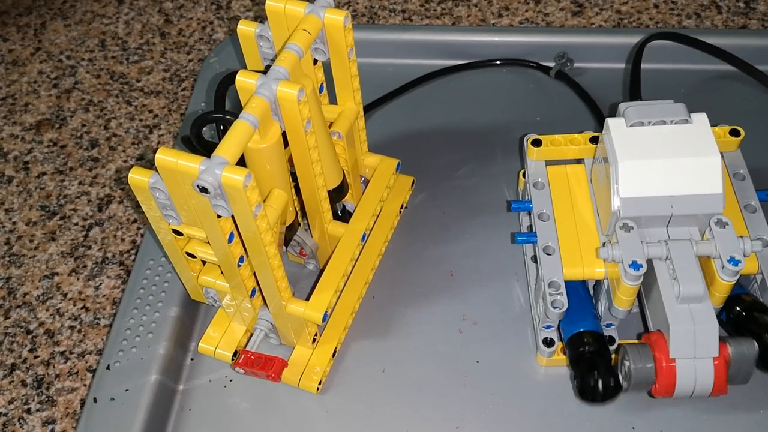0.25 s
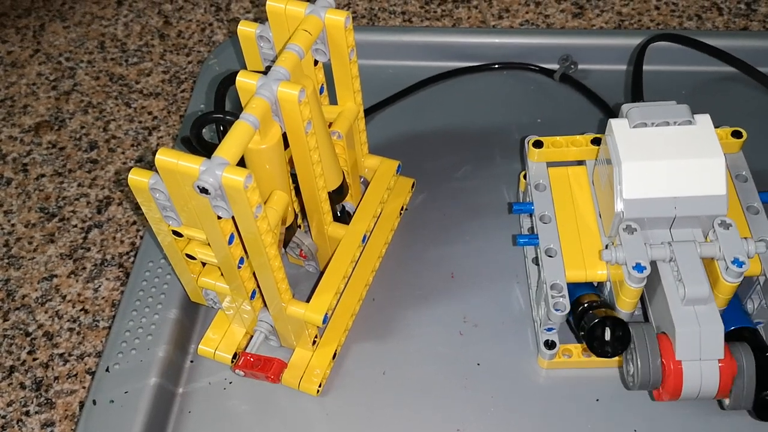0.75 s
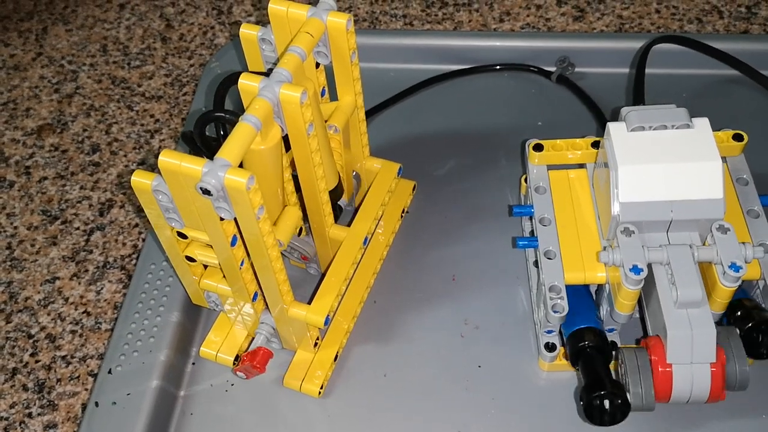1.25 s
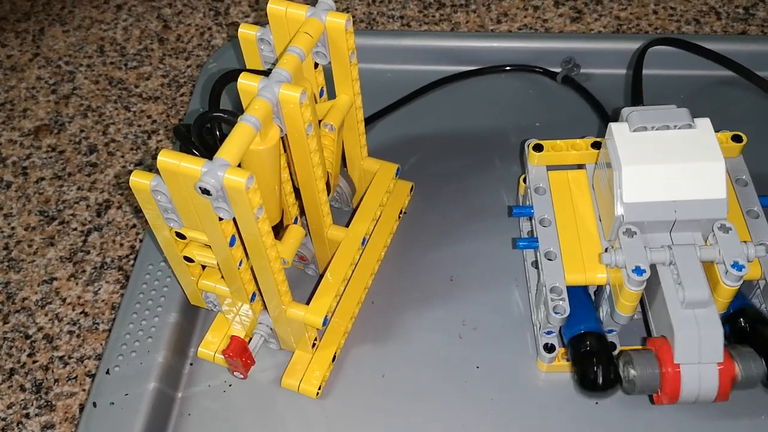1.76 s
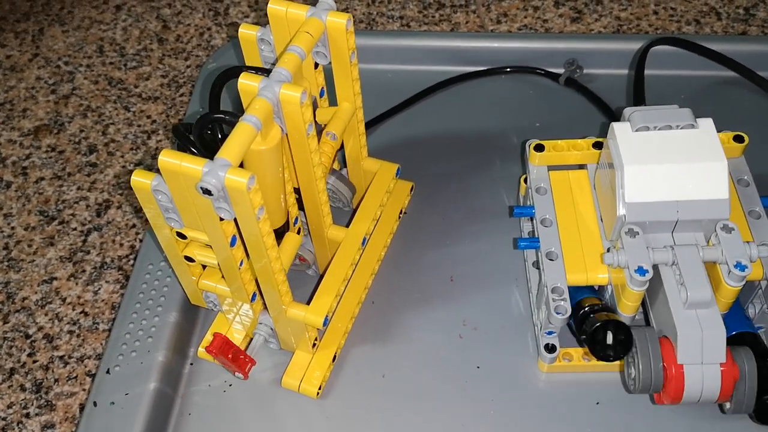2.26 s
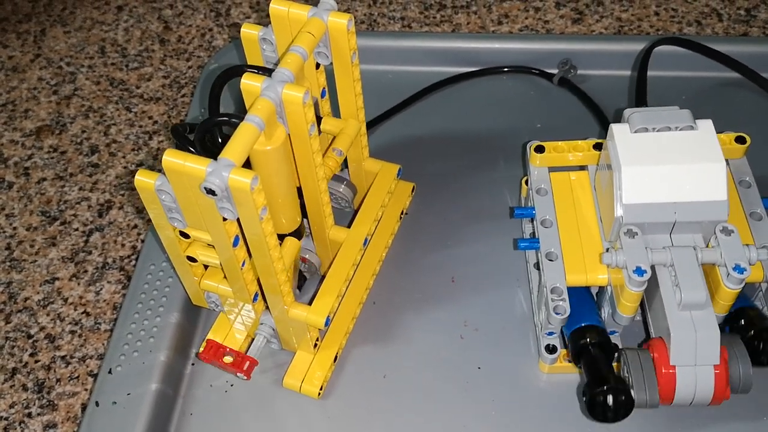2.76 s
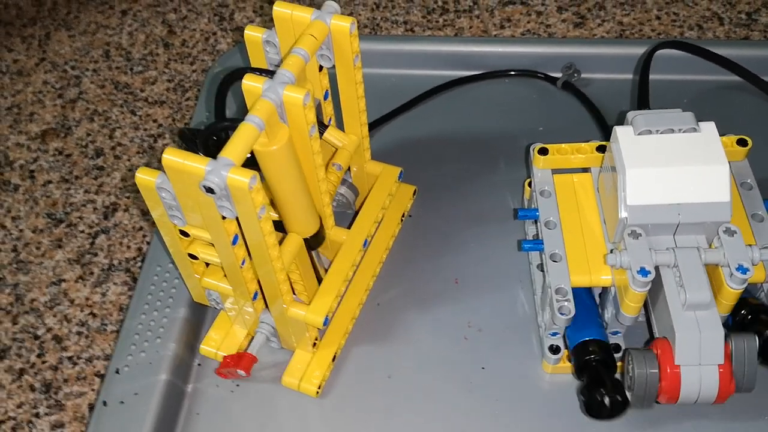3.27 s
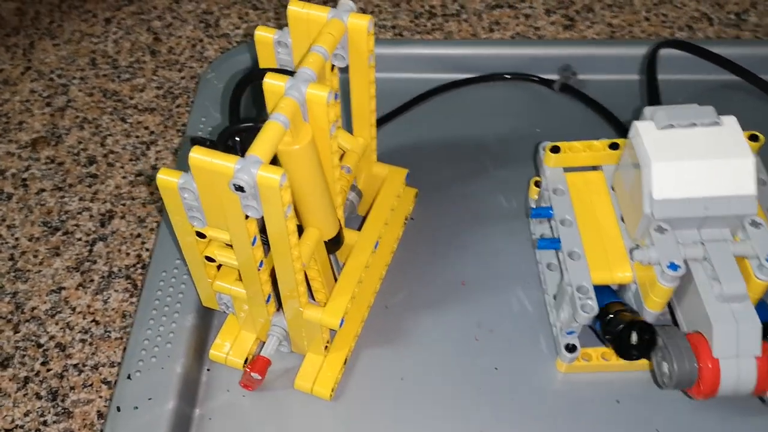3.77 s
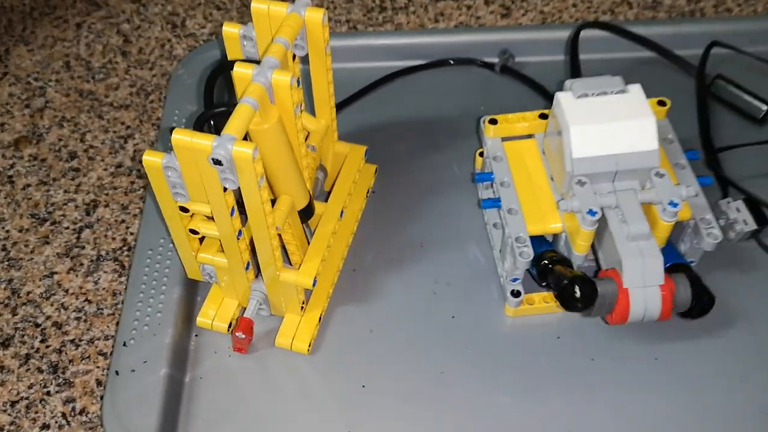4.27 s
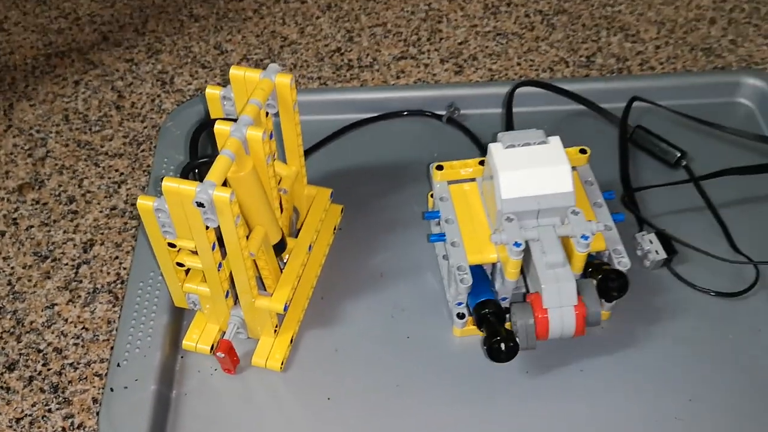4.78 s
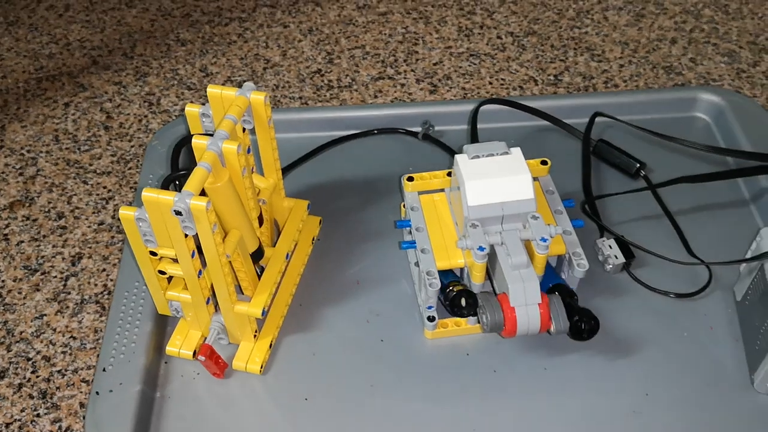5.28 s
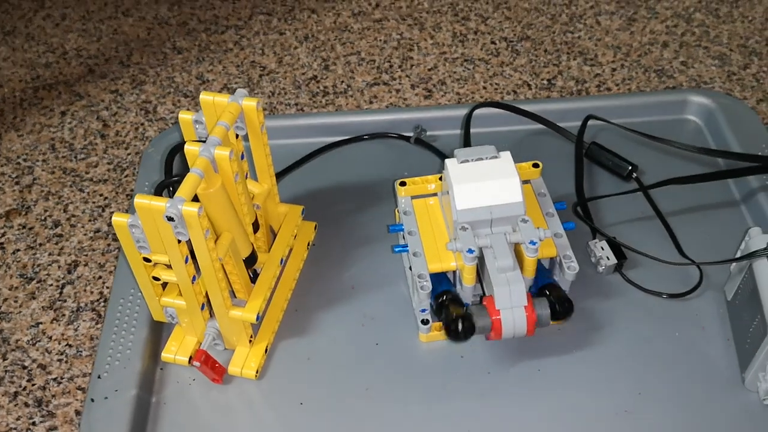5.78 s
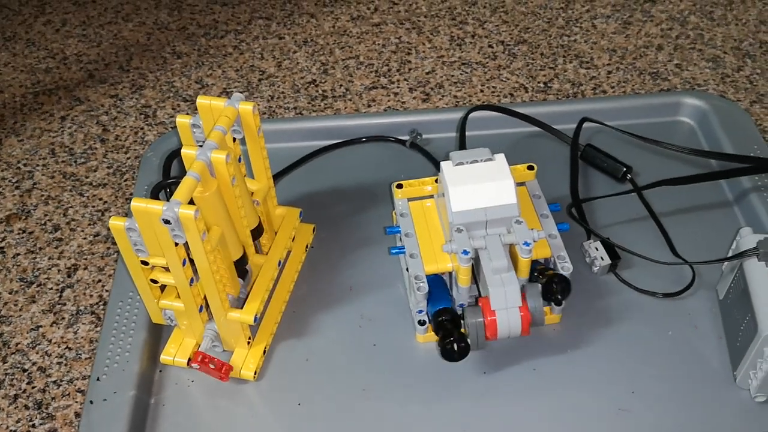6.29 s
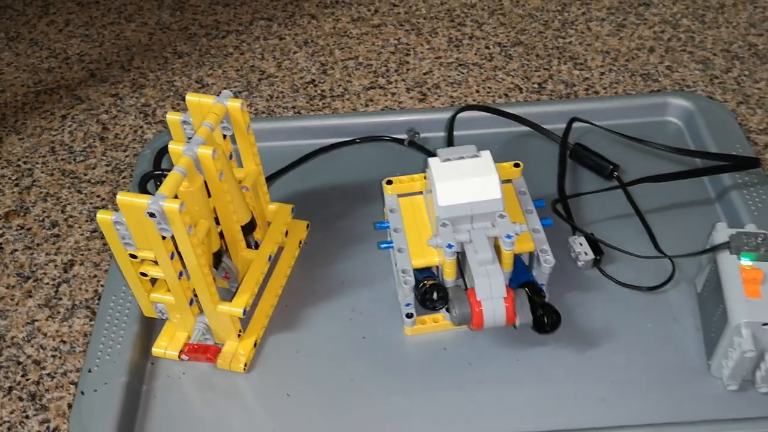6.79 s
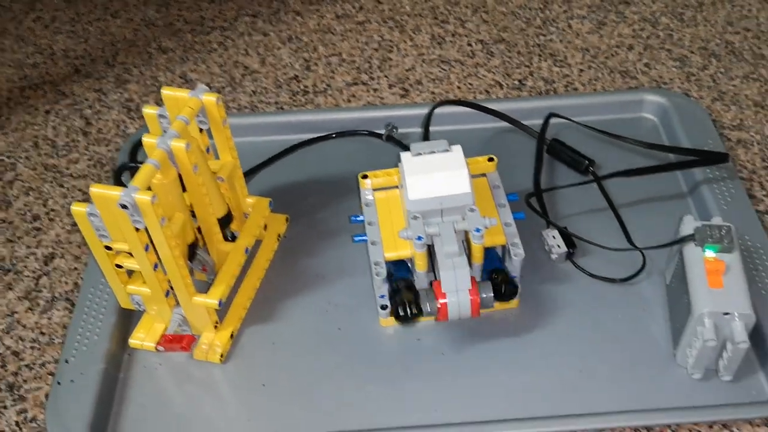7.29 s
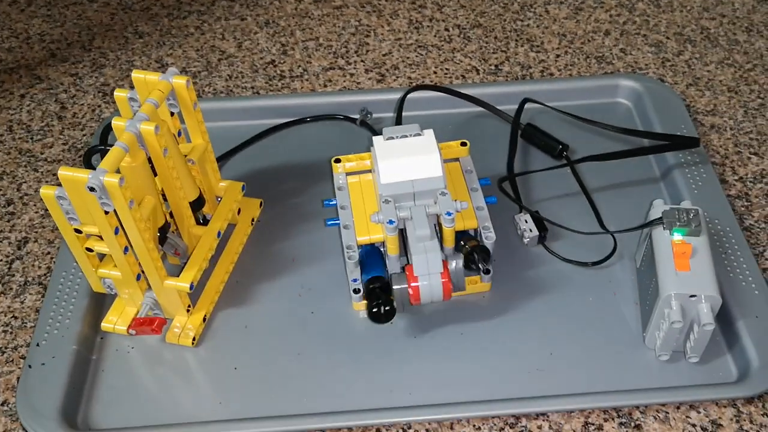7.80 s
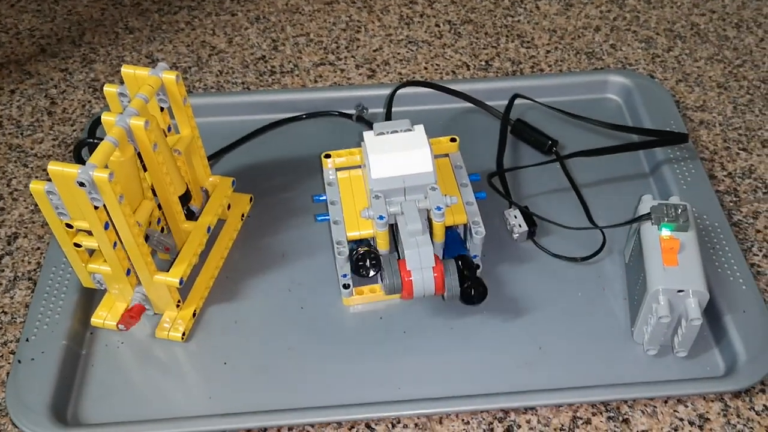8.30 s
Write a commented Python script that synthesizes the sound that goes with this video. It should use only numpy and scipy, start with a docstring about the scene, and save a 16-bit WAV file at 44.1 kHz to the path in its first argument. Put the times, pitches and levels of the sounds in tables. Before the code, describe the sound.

From 0 to about 8.7 seconds a small geared motor works two plastic air pumps on a metal tray, heard close with short room reflections and faint deep rumble. Strokes come about every 0.35 to 0.4 seconds, slightly uneven. In each, the motor labours low and quiet, a sharp-edged puff of hissing air opens, a plastic clack and dull thud fall inside it, then the gears race: a ticking, buzzy whine sweeps up to around a thousand teeth per second and back down over bright rasping chatter and a ringing case. Clack strength varies, often alternating. The machine grows slightly quieter over the first 3.6 seconds as the handheld microphone draws back. A soft low bump comes at 1.2 seconds, a hard booming cluster at 3.9 to 4.1, and another dull knock at 5.8. Pumping continues to the end.

```python
"""A geared toy motor cranks two air pumps on a metal tray for a pneumatic toy engine, over low room rumble.
Each stroke: the motor labours, a puff of noise opens, the crank clacks and thuds within it, and the motor
races as the piston turns over: ticking teeth whine up and down over rasping chatter and a ringing gear case.
The hand-held camera draws back, mostly in the first 3.6 s. Damped low modes ring as it is bumped:
softly at 1.2 s, in a hard cluster around 4 s and once more at 5.8 s."""
import sys
import numpy as np
from scipy import signal
from scipy.fft import rfft, irfft, next_fast_len
from scipy.io import wavfile
from scipy.ndimage import map_coordinates

SR = 44100
rng = np.random.default_rng(int(sys.argv[2]) if len(sys.argv) > 2 else 0)


def unload_audio(sound):
    """Save the sound as a 16-bit wav file, at the path given as the first command line argument."""
    columns = np.transpose(np.atleast_2d(sound))
    # keep every value between -1 and 1, then stretch to whole-number steps
    steps = np.round(np.clip(columns, -1, 1) * 32767)
    wavfile.write(sys.argv[1], SR, steps.astype(np.int16))


N = 376613
TIME = np.arange(N) / SR


def undb(db):
    """Decibels to gain."""
    return 10 ** (np.asarray(db) / 20)


def unit(x):
    """Scale to rms 1."""
    return x / np.sqrt(np.mean(x ** 2))


def response(points, hz):
    """Gain of a (f/Hz, level/dB) colour, interpolated over log frequency."""
    f, db = np.transpose(points)
    return undb(np.interp(np.log(hz + 1), np.log(f), db))


def colour(x, points, modes=()):
    """Pass a sound through a broad colour with resonances standing on it."""
    size = next_fast_len(N + SR)
    hz = np.arange(size // 2 + 1) * SR / size
    power = 1
    for f, width, db in modes:
        power = power + undb(db) ** 2 / (1 + (2 * (hz - f) / width) ** 2)
    spectrum = rfft(x, size) * response(points, hz) * np.sqrt(power)
    return irfft(spectrum, size)[..., :N]


def walk(rate):
    """Smooth chance with a spread near 1, drawn anew `rate` times a second."""
    knots = rng.standard_normal(N // 10)
    return 1.21 * np.interp(TIME * rate, np.arange(len(knots)), knots)


def noise(spread):
    """Noise from a wide object: each microphone port hears a shared part and a part of its own."""
    draw = rng.standard_normal((3, N))
    return unit(draw[0] + spread * draw[1:])


def clicks(times, sizes):
    """Impulses, each shared between two neighbouring samples."""
    at = np.clip(np.asarray(times) * SR, 0, N - 2)
    i = at.astype(int)
    later = at - i
    return np.bincount(i, sizes * (1 - later), N) + np.bincount(i + 1, sizes * later, N)


def fading(t60):
    """Half a second of envelope that falls by 60 dB in t60 seconds."""
    return np.exp(-np.log(1000) * TIME[:SR // 2] / t60)


def bell(t, width):
    """Smooth rise and fall, 1 at t = 0."""
    return np.exp(-.5 * (t / width) ** 2)


def echoes(x, t60):
    """Dense reflections of unit energy, different at each port."""
    tail = rng.standard_normal((2, SR // 2)) * fading(t60)
    tail /= np.sqrt(np.sum(tail ** 2, axis=1, keepdims=True))
    return signal.fftconvolve(x, tail, axes=1)[:, :N]


# colour of the room's rumble: (f/Hz, relative level/dB)
RUMBLE_COLOUR = [(12, -3.5), (22, 13), (32, 0), (50, -10), (70, -10.5), (130, -23.5), (220, -22.5),
                 (400, -42.5), (2000, -28), (14000, -88)]


def rumble(db=-47.5, swell_db=0.0):
    """Low room rumble, alike at both ports; swell_db sets how far its level wavers."""
    return unit(colour(rng.standard_normal(N), RUMBLE_COLOUR)) * undb(db + swell_db * walk(26))


# knocks on the camera body: (t/s, relative level/dB, push length/s)
BUMPS = [(1.243, -44.5, .0026), (3.922, -39.5, 0.00089), (3.987, -43, 0.0035), (4.068, -23, 0.003),
         (4.084, -11.5, 0.0051), (5.786, -28.5, 0.0097)]
# damped modes of the camera body: (f/Hz, relative level/dB, t60/s)
BODY_MODES = [(123, -14, 0.14), (143, -4, 0.05), (196, -3.5, 0.041), (260, -4.5, 0.052)]


def bumps(room_db=-6.5, room_t60=0.41):
    """Soft pushes ring the low modes of the camera body and leave a short rumble, alike at both ports."""
    push = 0
    for s, db, length in BUMPS:
        shape = np.exp(-np.pi * np.minimum((2 * (TIME - s) / length) ** 2, 20))
        push = push + undb(db) * shape * 2 / (length * SR)  # a longer push has a lower peak
    ring = 0
    for hz, db, t60 in BODY_MODES:
        ring = ring + undb(db) * fading(t60) * np.cos(2 * np.pi * hz * TIME[:SR // 2])
    body = [(70, -7), (130, 0.5), (255, 4.0), (310, -9.5), (800, 9)]
    thump = colour(signal.fftconvolve(push, ring)[:N], body)
    return thump + undb(room_db) * echoes(thump[None], room_t60)[0]


# pump strokes, the two pumps in turn: (t/s of top speed, relative clack level/dB)
STROKES = [(-.05, -25), (.35, -16.5), (.752, -20), (1.151, -16.5), (1.518, -29), (1.897, -19), (2.255, -32),
           (2.612, -16), (2.979, -30), (3.316, -26), (3.662, -28), (4.016, -19), (4.386, -29), (4.763, -21),
           (5.148, -25), (5.541, -16.5), (5.943, -29), (6.315, -18), (6.686, -33), (7.06, -18),
           (7.451, -25), (7.854, -18), (8.273, -22), (8.665, -21)]
# the two pumps: (top tooth rate f/Hz, clack before top speed as a share of the stroke's length)
PUMPS = [(1062, 0.1), (1080, 0.13)]
USUAL_STROKE_S = 0.36


def turnovers():
    """For each stroke: time, clack level, time since the stroke before, and its pump's top rate and clack lead."""
    s, clack_db = np.transpose(STROKES)
    top_hz, lead = np.transpose(PUMPS)[:, np.arange(len(s)) % 2]
    length = np.diff(s, prepend=s[0] - USUAL_STROKE_S)
    return s, clack_db, length, top_hz, lead


# a puff of air: level at the machine, time fully open before top speed, hold, attack and release
PUFF_DB, PUFF_LEAD_S, PUFF_HOLD_S = -32, 0.053, .052
PUFF_ATTACK_DB_PER_S, PUFF_RELEASE_DB_PER_S = 420, 170


def airflow():
    """Each turnover lets out a puff that opens fast ahead of top speed, holds and dies away."""
    since = TIME - turnovers()[0][:, None] + PUFF_LEAD_S
    attack_db = PUFF_ATTACK_DB_PER_S * since
    release_db = PUFF_RELEASE_DB_PER_S * (PUFF_HOLD_S - since)
    shape_db = np.minimum(attack_db, release_db).max(axis=0)
    return undb(PUFF_DB + np.minimum(shape_db, 0))


# colour of the escaping air: (f/Hz, relative level/dB)
AIR_COLOUR = [(200, -9), (600, -46), (1050, 11), (1400, 1), (2500, 11), (4300, -4), (5400, 17.5), (6300, 8),
              (9300, 10.5), (10800, 9.5), (12200, -13), (13300, -2.5), (15000, -18)]


def air(flutter_db=3.0, spread=1.0):
    """Turbulent air escapes through narrow ports as fluttering noise."""
    return unit(colour(noise(spread), AIR_COLOUR)) * undb(flutter_db * walk(200))


# colours of the plastic clack and of the thud into the tray: (f/Hz, relative level/dB)
CLACK_COLOUR = [(200, 1), (600, -69), (1100, 19.5), (1600, 21), (3000, 9), (5500, 13), (9000, 5),
                (15000, -22)]
THUD_COLOUR = [(40, -28), (100, -5), (180, 10), (250, -2.5), (330, -8), (800, -5), (2000, -33)]


def crank(clack_t60=0.077, thud_t60=0.19, clack_db=-10.5, thud_db=-36.5, thud_share=.5, rise_s=0.0026,
          clatter_db=2.5):
    """Each reversal closes the crank's play: a clattering clack and a dull thud that grows with it."""
    s, force_db, length, _, lead = turnovers()
    s = s - lead * length
    heard = (s > 0) & (s < TIME[-1])
    onset = 1 - np.exp(-TIME[:SR // 2] / rise_s)
    clack = force_db + clack_db, clack_t60, CLACK_COLOUR
    thud = thud_share * force_db + thud_db, thud_t60, THUD_COLOUR
    out = 0
    for db, t60, points in (clack, thud):
        hits = clicks(s[heard], undb(db[heard]))
        envelope = signal.fftconvolve(hits, onset * fading(t60))[:N]
        out = out + envelope * unit(colour(noise(0.54), points))
    return out * undb(clatter_db * walk(150))


# the motor races in a bell around each turnover; high pressure makes a stroke longer,
# and the motor slower and quieter
RACE_WIDTH_S, LABOUR_HZ, SAG_HZ_PER_S = .061, 345.6, 500
LABOUR_DB, SAG_DB_PER_S = -45.5, 102
# the gears are loudest a little after top speed, when the load comes back on
RACE_DB, LOAD_LAG_S, LOAD_WIDTH_S = -27, 0.0093, 0.094
# just before top speed the teeth float in their play: the gears hush and the whine drops back
FLOAT_LEAD_S, FLOAT_WIDTH_S, FLOAT_GEAR_DB, FLOAT_WHINE_DB = 0.034, 0.018, -8.5, -6.5
# whine over chatter
WHINE_LABOUR_DB, WHINE_RACE_DB = -7, 3


def drive(jitter=0.00902, uneven_db=1.0):
    """The motor labours and races: tooth rate, level of the gears and whine over chatter in dB."""
    s, _, length, top_hz, _ = turnovers()
    since = TIME - s[:, None]
    overrun = np.interp(TIME, s - length / 2, length - USUAL_STROKE_S)
    race = bell(since, RACE_WIDTH_S).sum(axis=0)
    load = bell(since - LOAD_LAG_S, LOAD_WIDTH_S).sum(axis=0)
    floating = bell(since + FLOAT_LEAD_S, FLOAT_WIDTH_S).sum(axis=0)
    labour_hz = LABOUR_HZ - SAG_HZ_PER_S * overrun
    hz = (1 - race) * labour_hz + race * np.interp(TIME, s, top_hz)
    labour_db = LABOUR_DB - SAG_DB_PER_S * overrun
    gear_db = (1 - load) * labour_db + load * RACE_DB + floating * FLOAT_GEAR_DB
    whine_db = (1 - race) * WHINE_LABOUR_DB + race * WHINE_RACE_DB + floating * FLOAT_WHINE_DB
    return hz * (1 + jitter * walk(170)), gear_db + uneven_db * walk(35), whine_db


# colour of the plastic housing: (f/Hz, relative level/dB)
HOUSING_COLOUR = [(300, -31), (480, -31), (720, -30.5), (980, -10), (1250, -22), (1700, -5), (2800, -3),
                  (3450, -5), (4100, 5), (4800, 0), (5600, -9.5), (6500, -4), (9300, -16), (11200, -9),
                  (12200, -13.5), (14500, -25.5)]
# resonances of the plastic frame: (f/Hz, width/Hz, level over the housing/dB)
FRAME_MODES = [(980, 43, 9), (1475, 50, 9), (2538, 43, 8), (3150, 230, 10), (3825, 280, 6),
               (5550, 190, 7.5), (9250, 360, 14)]


def chatter(hz, spread=1.45, mesh_depth=0.36, rattle_db=1.92):
    """Loose plastic parts rasp in step with the teeth and ring the frame."""
    mesh = 1 + mesh_depth * np.cos(2 * np.pi * np.cumsum(hz) / SR)
    rasp = noise(spread) * mesh * undb(rattle_db * walk(300))
    hard = unit(colour(rasp, HOUSING_COLOUR, FRAME_MODES))
    # slow teeth touch softly and sound duller
    soft = unit(colour(hard, [(1700, 6.5), (4000, -6.0), (8000, -5), (14000, -5.5)]))
    speed = np.interp(hz, [380, 800], [0, 1])
    return speed * hard + (1 - speed) * soft


# colours of the gear whine and of the ringing gear case: (f/Hz, relative level/dB)
WHINE_COLOUR = [(350, -29), (470, -16.5), (650, -27), (820, -14.5), (950, 2.5), (1070, -14), (1300, -2.5),
                (1600, 9), (2100, 5), (2600, 2.5), (3150, 5.5), (3850, 13.5), (4400, 2.5), (5400, 10),
                (6500, -6.5), (7600, -17), (9000, -1.5), (13000, -31)]
CASE_COLOUR = [(350, -37.5), (750, -35), (920, -14.5), (1000, -0.5), (1085, -0.5), (1170, -24), (1500, -55)]
# the case's level when racing, the share of the gears' level changes it follows, and how much it wavers
CASE_DB, CASE_FOLLOW, CASE_WAVER_DB = -47.5, 0.62, 3


def whine(hz, tooth_db=1.0, slop=0.01, flutter_db=2.5, bend=1.4):
    """Meshing teeth tick at the tooth rate, each a little different: their whine, and the case's ring."""
    turns = np.cumsum(hz) / SR  # in teeth
    count = int(turns[-1])
    chance = rng.standard_normal((N // 20, 2))[:count]
    times = np.interp(np.arange(count) + slop * chance[:, 0], turns, TIME)
    teeth = clicks(times, undb(tooth_db * chance[:, 1])) / np.sqrt(hz)
    # bending waves carry the treble through the plastic faster than the bass, which smears each tick
    size = next_fast_len(N + SR)
    delay = np.exp(-1j * bend * np.sqrt(np.arange(size // 2 + 1) * SR / size))
    teeth = irfft(rfft(teeth, size) * delay, size)[:N]
    # the case sings out whenever a harmonic of the tooth rate sweeps through its resonance
    case = unit(colour(teeth, CASE_COLOUR)) * undb(CASE_WAVER_DB * walk(50))
    return unit(colour(teeth, WHINE_COLOUR)) * undb(flutter_db * walk(160)), case


# left minus right at the microphone ports: (f/Hz, level/dB)
BALANCE_DB = [(1000, -1), (1700, -0.5), (2500, -4), (3200, -7), (3900, -6), (5300, -7), (6200, -3.5),
              (7300, 0.5), (9000, 3.5), (10500, -4), (11600, -3), (13000, -4.5)]
# camera position: (t/s, further left minus right level/dB, lag of the left port/ms, machine level/dB)
CAMERA = [(0, 1, 0.049, 0.5), (3.6, 0.95, 0.073, -1.5), (4.7, 3, 0.034, -1.68), (8.5, 3.5, -0.094, -2.08)]


def ports(x, room_db=-2.5, room_t60=0.17):
    """The machine reaches the two microphone ports directly and by way of the tray and the room."""
    s, *columns = np.transpose(CAMERA)
    pan_db, lag_ms, near_db = (np.interp(TIME, s, c) for c in columns)
    lag = lag_ms * SR / 1000  # in samples
    left = map_coordinates(x[0], [np.arange(N) - lag], order=3)
    direct = np.array([left, x[1]])
    heard = (direct + undb(room_db) * echoes(x, room_t60)) * undb(near_db)
    out = []
    for channel, side in zip(heard, (.5, -.5)):  # half of each difference on either side
        balance = [(f, side * db) for f, db in BALANCE_DB]
        out.append(colour(channel, balance) * undb(side * pan_db))
    return np.array(out)


def scene():
    """The machine and its air, heard from the camera over the rumble, with the bumps."""
    hz, gear_db, whine_db = drive()
    share = undb(whine_db)
    teeth, case = whine(hz)
    gears = (share * teeth + chatter(hz)) / np.sqrt(1 + share ** 2)
    motor = undb(gear_db) * gears
    ring = case * undb(CASE_DB + CASE_FOLLOW * (gear_db - RACE_DB))
    machine = motor + ring + air() * airflow() + crank()
    return ports(machine) + bumps() + rumble()


def record(dry):
    """The recorder cuts the top steeply above 15.2 kHz."""
    lowpass = signal.ellip(10, .2, 80, 15200, fs=SR, output="sos")
    return signal.sosfilt(lowpass, dry)


dry = scene()
out = record(dry)
unload_audio(out)
```